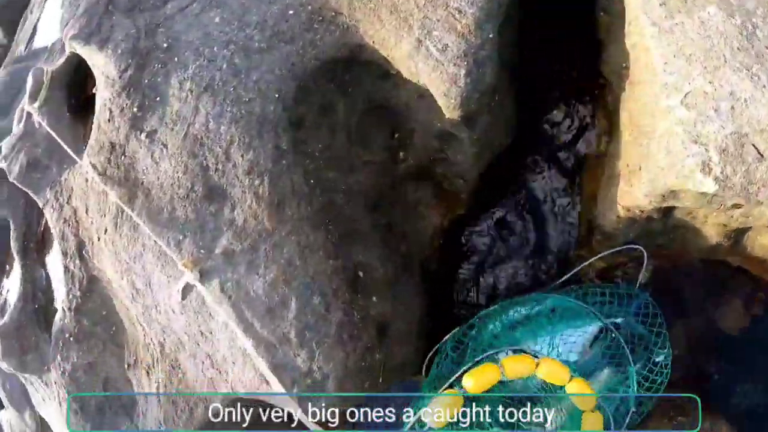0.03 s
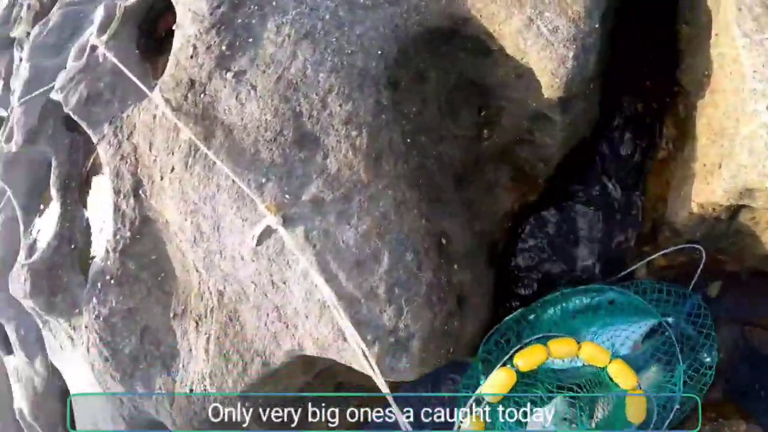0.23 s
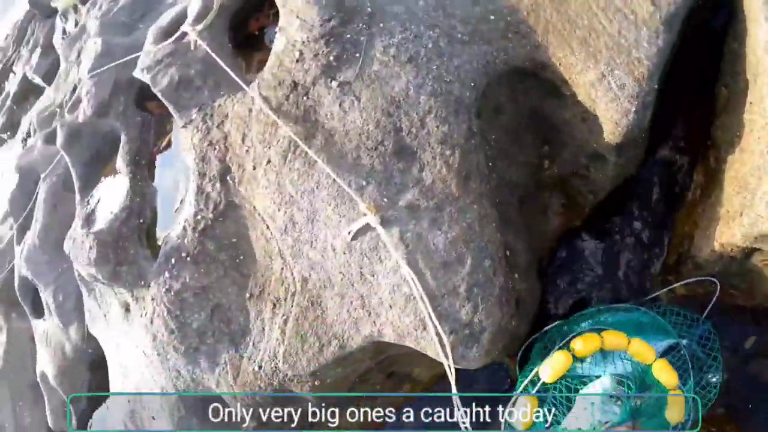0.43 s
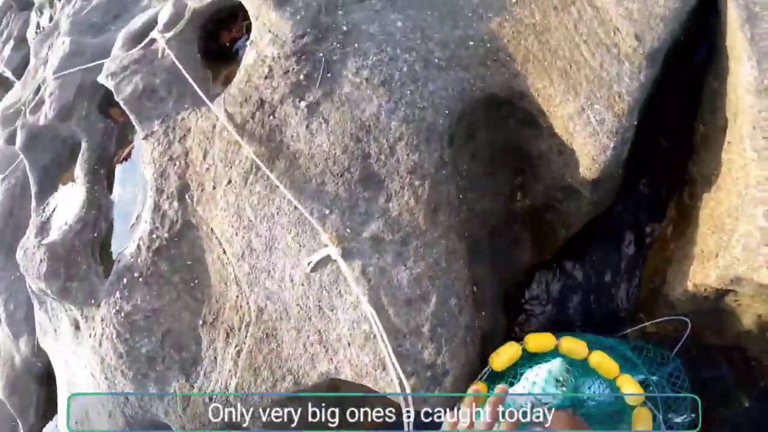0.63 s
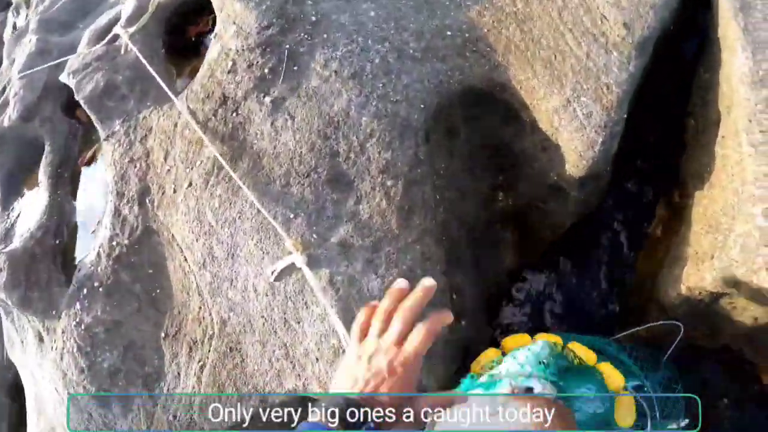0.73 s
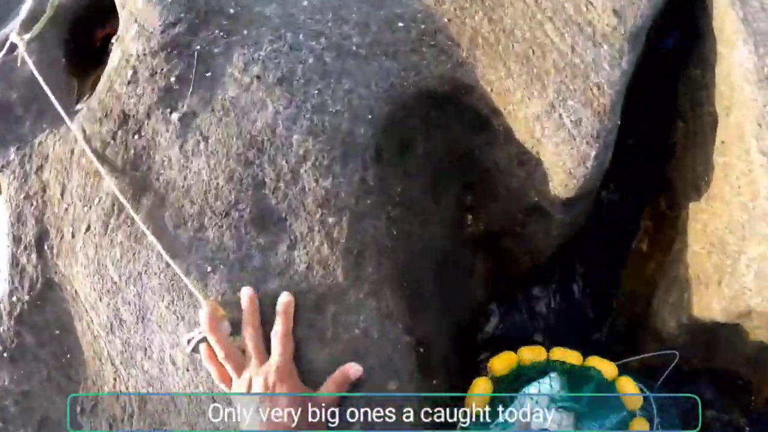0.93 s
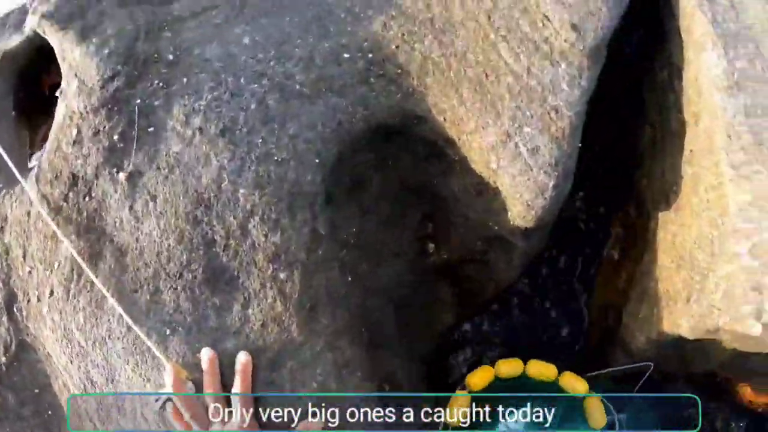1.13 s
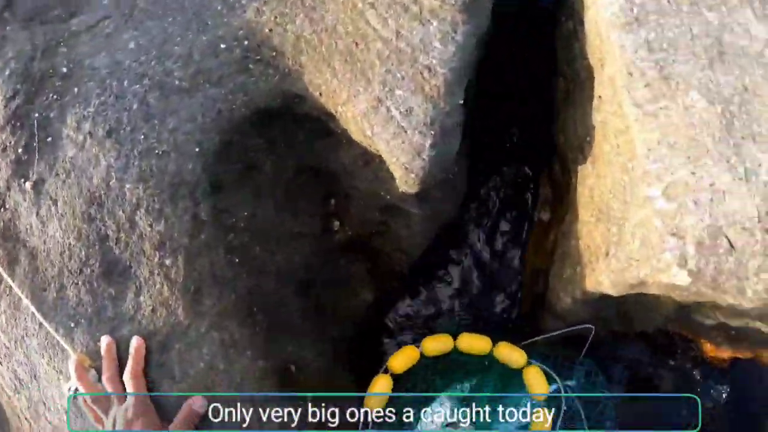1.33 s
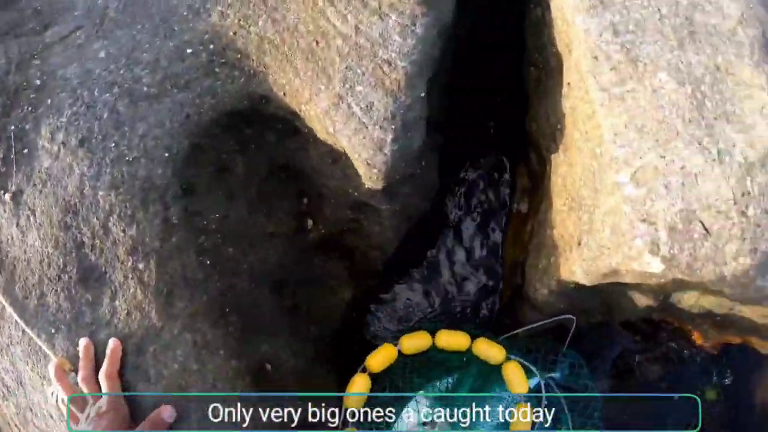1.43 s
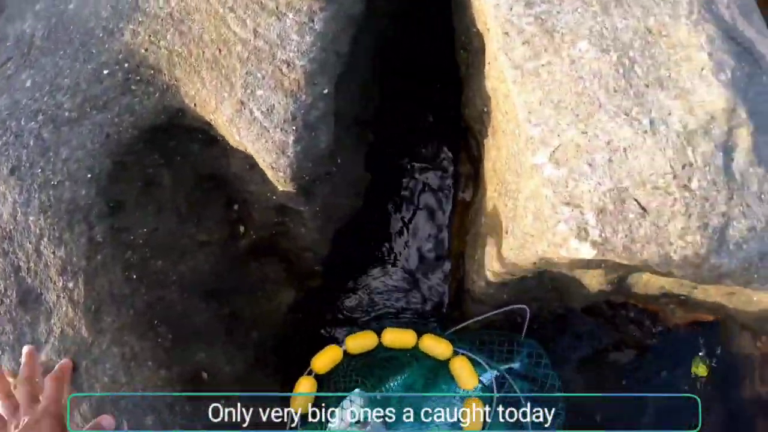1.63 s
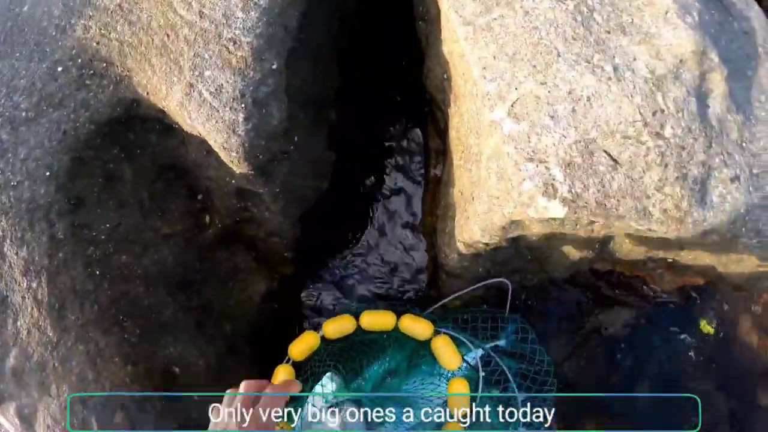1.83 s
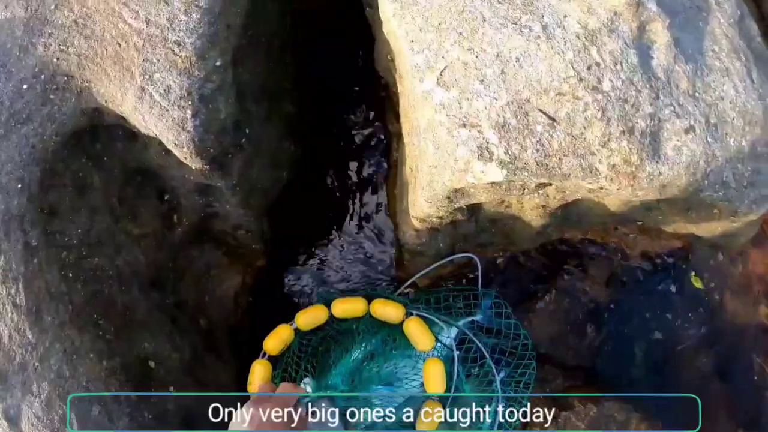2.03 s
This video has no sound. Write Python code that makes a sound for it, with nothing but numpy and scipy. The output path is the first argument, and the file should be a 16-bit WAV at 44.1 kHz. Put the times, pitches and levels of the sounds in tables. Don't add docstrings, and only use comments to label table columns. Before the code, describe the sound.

Wind buffets a small outdoor microphone throughout, a deep uneven rumble with flutter and dull cracks, thickest around 0.4-0.6 s and from 1.75 s to the end. Seawater sloshes quietly below among boulders: a sharp slap at 0.1 s, quick slaps near 0.5 s, a lull, then a swell from about 1.05 s with splashes, a low bubble plop at 1.2 s and another plop at 2.05 s.

```python
import sys
import numpy as np
from scipy import signal
from scipy.fft import rfft, irfft
from scipy.io import wavfile
from scipy.ndimage import map_coordinates

SR = 44100
rng = np.random.default_rng(int(sys.argv[2]) if len(sys.argv) > 2 else 0)


def attenuation_scalar(level_db):
    decades = np.asarray(level_db, float) / 20
    return 10 ** decades


def to_wav(sig):
    pcm = np.clip(np.atleast_2d(sig), -1, 1) * 32767
    pcm = np.round(pcm).astype(np.int16)
    wavfile.write(sys.argv[1], SR, pcm.T)


N = 92080

# t/s, level/dB
WIND_FORCE = [(0.0, -16), (0.16, -18.5), (0.26, -21.5), (0.34, -14), (0.37, -20.5), (0.62, -16.5),
              (0.64, -24), (0.84, -20.5), (0.89, -19.5), (0.98, -26.5), (1.12, -17.5), (1.25, -18.5),
              (1.47, -21.5), (1.57, -14.5), (1.61, -26), (1.64, -17.5), (2.03, -14.5), (2.09, -16.5)]
# t/s, level/dB
GUSTS = [(0.0, -32.5), (0.06, -44), (0.13, -31), (0.33, -37), (0.45, -29), (0.75, -40), (0.81, -33),
         (0.96, -46), (1.03, -37), (1.05, -45), (1.14, -21), (1.2, -39.5), (1.39, -27), (1.47, -38),
         (1.56, -29), (1.71, -41), (1.75, -31), (2.09, -25)]
# f/Hz, level per Hz/dB
RUMBLE_COLOUR = [(8, -22), (22, -1), (36, 3.5), (50, -5.5), (75, -6), (125, -13), (200, -29), (400, -77)]
# t/s, level/dB
SEA_LEVEL = [
    (0.0, -48),
    (0.4, -46.5),
    (0.66, -48.5),
    (0.85, -48),
    (1.18, -43),
    (1.68, -43.5),
    (2.09, -45),
]
# f/Hz, level per Hz/dB
WASH_COLOUR = [(250, -6), (600, 5.5), (2800, -9), (4000, -13), (5200, -24.5), (7300, -22), (10000, -35),
               (15500, -69.5)]
# t of crest/s, level/dB, rise/s, fall/s
SPLASHES = [(.008, -72, 0.0096, 0.011), (.0995, -47, 0.0012, 0.0029), (.104, -47, 0.0024, 0.014),
            (.532, -57, 0.0089, 0.0069), (.6, -75, 0.017, 0.025), (.81, -52, 0.048, 0.057),
            (.92, -55, 0.039, 0.11), (1.6, -51.5, 0.023, 0.032), (1.97, -49.5, 0.038, 0.083),
            (.843, -53, 0.0042, 0.06), (.152, -51, 0.044, 0.019), (.335, -52, 0.0092, .015),
            (.675, -49, 0.014, 0.0072), (1.03, -47, 0.012, .008), (1.056, -41, 0.015, 0.018),
            (1.136, -43, 0.015, 0.01), (1.17, -46, 0.018, .03), (1.21, -45.5, 0.0091, .015),
            (1.345, -39.5, 0.00083, .006), (1.376, -57, .0015, .005), (1.46, -65, 0.0025, .04),
            (1.77, -46, .004, 0.056), (1.851, -43, 0.0016, 0.0036), (1.906, -43, 0.017, 0.017),
            (2.054, -49, 0.0026, .006)]
# f/Hz, level per Hz/dB
SPRAY_COLOUR = [(700, 11.5), (2000, 9), (3500, 5.5), (5200, -1.5), (7500, -9.5), (10500, -22),
                (12800, -28.5), (15000, -66)]
# t of crest/s, level/dB, rise/s, fall/s
MISTS = [
    (.103, -48.5, 0.0054, .007),
    (.33, -62.5, .008, .008),
    (1.03, -58, .005, .006),
    (1.052, -52, .01, .01),
    (1.135, -61, .006, .006),
    (1.32, -68, .005, .006),
    (1.348, -67, .006, .01),
    (1.905, -66, .01, .008),
]
# f/Hz, level per Hz/dB
MIST_COLOUR = [(1500, -15), (3000, -4), (5000, -6.5), (7500, -0.5), (9500, -9), (12000, -14),
               (13500, -30.5), (16000, -52)]
# t of crest/s, level/dB, rise/s, fall/s
SLAPS = [(.1, -35.5, 0.0016, 0.0053), (.205, -49, .005, .01), (.255, -41.5, 0.037, 0.044),
         (.33, -46, 0.049, 0.025), (.425, -45.5, 0.009, 0.012), (.454, -37.5, .002, 0.0039),
         (.494, -39.5, 0.0044, 0.0045), (.512, -35.5, 0.0015, 0.0027), (.525, -34.5, 0.0023, 0.0032),
         (.535, -35.5, 0.0032, 0.0052), (.595, -43.5, 0.019, 0.02), (1.204, -39, .002, .01),
         (1.24, -40, 0.015, 0.037), (1.28, -45, 0.014, 0.0097), (1.39, -56, 0.0091, .015),
         (1.47, -38, 0.013, .02), (1.6, -38.5, 0.032, 0.023), (1.79, -41.5, 0.021, 0.017),
         (1.9, -40.5, 0.0092, 0.032), (1.98, -46.5, 0.012, 0.012), (2.014, -45.5, 0.0017, 0.0089),
         (2.056, -46, 0.0031, 0.0071)]
# f/Hz, level per Hz/dB
SLAP_COLOUR = [(250, -19), (600, 2), (1100, 2), (1800, -4.5), (3000, -15.5), (4200, -20), (6000, -53)]
# t/s, peak level/dB, f/Hz, time to die by 60 dB/s
BUBBLES = [(.008, -35, 2430, 0.014), (0.134, -35, 1020, 0.025), (0.104, -30, 2060, 0.025),
           (.842, -44, 5500, 0.01), (0.914, -46, 2710, 0.18), (1.05, -39, 3300, 0.026),
           (1.136, -34, 2380, 0.032), (1.202, -22, 791, 0.07), (1.24, -28, 1320, 0.021),
           (1.317, -51, 7560, 0.051), (1.319, -50, 5950, .015), (1.342, -42, 6800, 0.0092),
           (1.351, -39.5, 2850, 0.056), (1.366, -51, 6940, 0.011), (1.457, -31.5, 2640, 0.031),
           (1.513, -26, 1055, 0.025), (1.697, -37, 1900, 0.015), (1.738, -30.5, 1910, 0.039),
           (1.775, -37, 2580, 0.03), (1.837, -52, 7240, .015), (1.891, -48.5, 5000, 0.048),
           (1.959, -42.5, 3040, 0.041), (2.011, -41.5, 4460, 0.022), (2.051, -20.5, 1280, 0.014),
           (2.055, -39, 2350, .015), (1.644, -38.5, 2950, 0.034), (1.543, -34, 2150, .02),
           (1.85, -39, 4050, 0.011), (2.027, -41, 4420, 0.02), (1.74, -46, 3800, .02),
           (1.17, -36, 1220, 0.034)]
# t/s, peak level/dB, f/Hz
WHIPS = [(0.122, -21.5, 346), (.153, -20.5, 400), (.404, -18.5, 560), (.43, -24.5, 800), (.422, -17, 520),
         (.436, -11.5, 152), (.447, -11, 96), (.456, -8.5, 277), (0.385, -15, 171), (.204, -25.5, 298),
         (0.611, -13, 103), (.8, -18, 155), (0.518, -13.5, 350), (.566, -21.5, 318), (0.584, -17.5, 300),
         (0.621, -19, 320), (0.636, -30.5, 420), (.81, -24, 314), (0.919, -27.5, 296), (1.25, -25.5, 396),
         (1.65, -23, 273), (1.68, -31, 295), (.03, -28, 342), (0.261, -25.5, 457), (1.8, -16.5, 134),
         (1.856, -16, 130), (1.146, -16.5, 200), (1.1, -16.5, 124), (1.832, -10, 175), (1.963, -10.5, 260),
         (1.983, -24, 330), (1.778, -26, 337), (2.025, -17, 220), (2.069, -14, 260), (.505, -34, 507),
         (.512, -15.5, 665), (0.523, -19, 720), (.532, -11.5, 494), (.537, -14, 990), (0.546, -31, 600),
         (0.599, -25, 395), (1.019, -30.5, 235), (1.106, -30, 250), (1.143, -22, 418), (1.331, -17.5, 345),
         (1.378, -19.5, 420), (1.561, -16.5, 445), (1.597, -23.5, 400), (1.722, -24.5, 490),
         (1.75, -22, 390), (1.824, -22.5, 620), (1.838, -21.5, 546), (1.878, -16, 388), (1.935, -16.5, 450),
         (1.958, -23, 394), (2.013, -12.5, 380), (2.042, -17.5, 350)]


def read(points, hz):
    f, value = np.transpose(points)
    return np.interp(np.log(hz + 1), np.log(f + 1), value)


def level_curve(table):
    t, level = np.transpose(table)
    return np.interp(np.arange(N) / SR, t, level)


def evened(x):
    return x / np.sqrt(np.mean(x ** 2) + 1e-20)


def add(mix, s, sound):
    part = mix[max(round(s * SR), 0):][:len(sound)]
    part += sound[:len(part)]


def coloured(x, points):
    gain = attenuation_scalar(read(points, np.fft.rfftfreq(len(x), 1 / SR)))
    return evened(irfft(rfft(x) * gain, len(x)))


def lumps(per_s):
    slowness = 1 + (np.fft.rfftfreq(N, 1 / SR) / per_s) ** 4
    return evened(irfft(rfft(rng.standard_normal(N)) / slowness, N))


def grains(per_s, low_hz, top_hz, cycles, tilt_db, spread_db, count=24):
    size = attenuation_scalar(spread_db * np.minimum(rng.exponential(1, N), 5))
    size *= rng.random(N) < per_s / SR
    size *= rng.choice([-1., 1.], N)
    kind = rng.integers(0, count, N)
    out = np.zeros(N)
    for k, hz in enumerate(np.geomspace(low_hz, top_hz, count)):
        u = np.arange(0, 1, hz / cycles / SR)
        wavelet = np.sin(np.pi * u) ** 2 * np.sin(2 * np.pi * cycles * u)
        level = attenuation_scalar(tilt_db * np.log2(hz / low_hz))
        out += level * signal.oaconvolve(size * (kind == k), wavelet)[:N]
    return evened(out)


def steadied(x, window_s):
    share = 0.79
    window = np.hanning(round(window_s * SR)) * 2 / (window_s * SR)
    power = signal.oaconvolve(x ** 2, window, "same")
    return evened(x / (abs(power) + 0.081) ** (share / 2))


def wind():
    force, gust = level_curve(WIND_FORCE), level_curve(GUSTS)
    rumble = steadied(coloured(rng.standard_normal(N), RUMBLE_COLOUR), window_s=0.15)
    rumble *= attenuation_scalar(2.5 * lumps(per_s=6.9))
    eddies = grains(1400, 132.4, 837, cycles=1.567, tilt_db=-10, spread_db=3.0)
    place = np.cumsum(attenuation_scalar(0.2 * (gust - gust.mean())))
    eddies = map_coordinates(eddies, [place], order=3, mode="mirror")
    eddies = steadied(eddies, window_s=0.062)
    eddy_level = attenuation_scalar(gust + 3.5 + 1.6 * lumps(per_s=40))
    return attenuation_scalar(force - 0.5) * rumble + eddy_level * eddies


def wash():
    surf = evened(rng.standard_normal(N))
    fizz = grains(3200, 799, 7100, cycles=7.17, tilt_db=4.0, spread_db=1.5)
    water = coloured(surf + attenuation_scalar(-8.5) * fizz, WASH_COLOUR)
    flicker_db = 0.8 * lumps(per_s=3.4)
    return water * attenuation_scalar(level_curve(SEA_LEVEL) + 1 + flicker_db)


def gurgles():
    blips = grains(130, 486.7, 3920, cycles=8.3, tilt_db=-2.0, spread_db=2.5)
    return attenuation_scalar(level_curve(SEA_LEVEL) + 1 - 10) * blips


def splashes(table, colour, crackle_db):
    t = np.arange(N) / SR
    shape = np.zeros(N)
    for s, db, rise, fall in table:
        fading = np.where(t < s, ((s - t) / rise) ** 2, (t - s) / fall)
        shape += attenuation_scalar(db) * np.exp(-fading)
    drops = rng.standard_normal(N) * attenuation_scalar(crackle_db * lumps(per_s=350))
    return shape * coloured(drops, colour)


def bubbles():
    rise_per_s, roughness_rad, onset_cycles = 0.8, 0.7, 2.5
    out = np.zeros(N)
    t = np.arange(0, 0.1, 1 / SR)
    slow = signal.butter(4, 350, fs=SR, output="sos")
    wobbles = signal.sosfilt(slow, rng.standard_normal((len(BUBBLES), len(t))))
    to_silence = np.cos(np.pi / 2 * t / t[-1])
    for (s, db, hz, t60), wobble in zip(BUBBLES, wobbles):
        creeping_t = t + rise_per_s * t ** 2 / 2
        tone = np.sin(2 * np.pi * hz * creeping_t + roughness_rad * evened(wobble))
        onset = np.sin(np.pi / 2 * np.minimum(t * hz / onset_cycles, 1)) ** 2
        add(out, s, attenuation_scalar(db - 60 * t / t60) * onset * tone * to_silence)
    return out


def whips():
    level_db, tightness, hiss_db, puff_s = -1.5, 1.5, -18.5, 0.0059
    out = np.zeros(N)
    t = np.arange(-0.015, 0.015, 1 / SR)
    hiss = rng.standard_normal((len(WHIPS), len(t)))
    for (s, db, hz), noise in zip(WHIPS, hiss):
        band = signal.butter(4, [0.72 * hz, 2.36 * hz], "band", fs=SR, output="sos")
        puff = evened(signal.sosfilt(band, noise)) * np.exp(-(t / puff_s) ** 2)
        crack = np.exp(-(t * hz * tightness) ** 2) * np.cos(2 * np.pi * hz * t)
        add(out, s + t[0], attenuation_scalar(db + level_db) * (attenuation_scalar(hiss_db) * puff - crack))
    return out


def scene():
    knee = attenuation_scalar(-8)
    air = knee * np.tanh(wind() / knee) + whips()
    dulling = signal.butter(4, 3300, fs=SR, output="sos")
    air = signal.sosfiltfilt(dulling, air)
    water = wash() + gurgles() + bubbles()
    water += splashes(SPLASHES, SPRAY_COLOUR, crackle_db=0.5)
    water += splashes(MISTS, MIST_COLOUR, crackle_db=1.9)
    water += splashes(SLAPS, SLAP_COLOUR, crackle_db=3.1)
    return (air + water)[None]


def low_pass(x):
    return signal.sosfilt(signal.butter(12, 15710, fs=SR, output="sos"), x)


def record(dry):
    hiss = attenuation_scalar(-94) * rng.standard_normal(dry.shape)
    offset = -0.008
    return low_pass(dry + hiss + offset)


dry = scene()
out = record(dry)
to_wav(out)
```